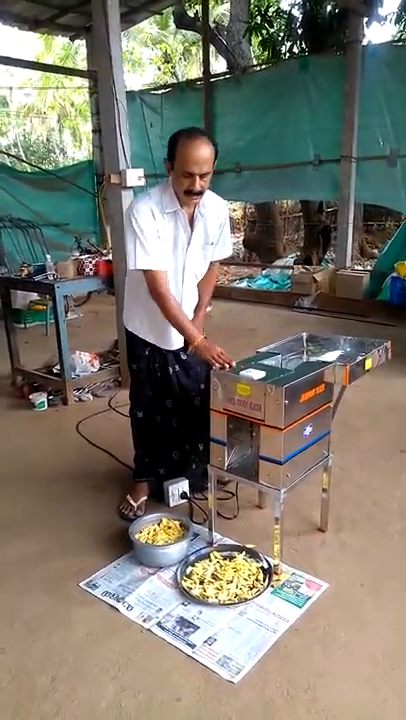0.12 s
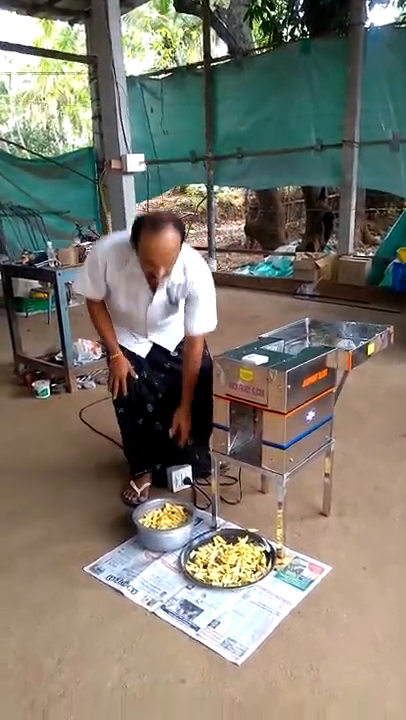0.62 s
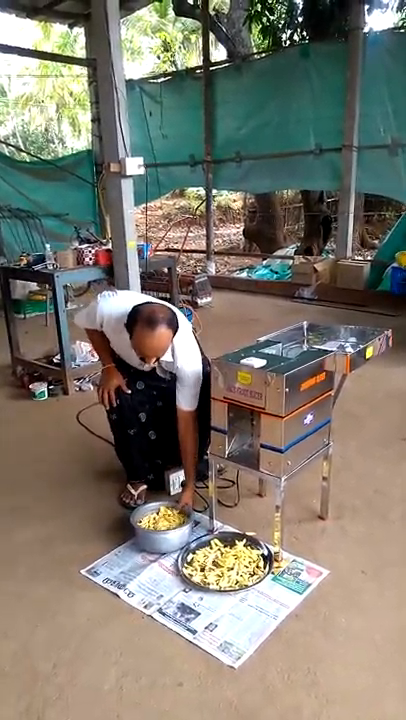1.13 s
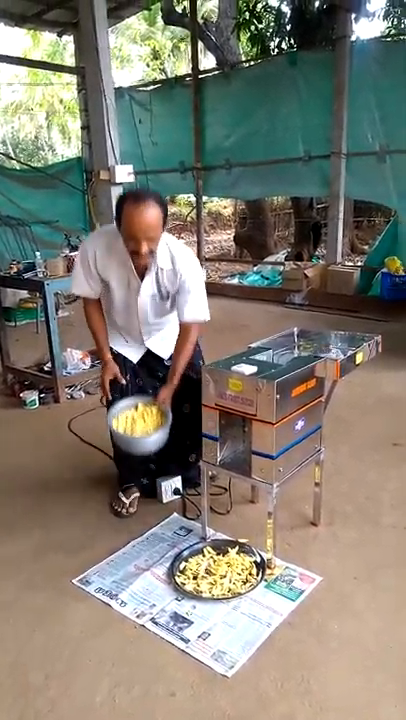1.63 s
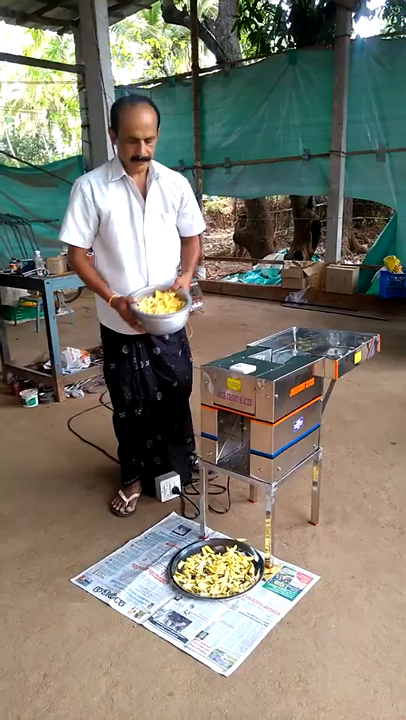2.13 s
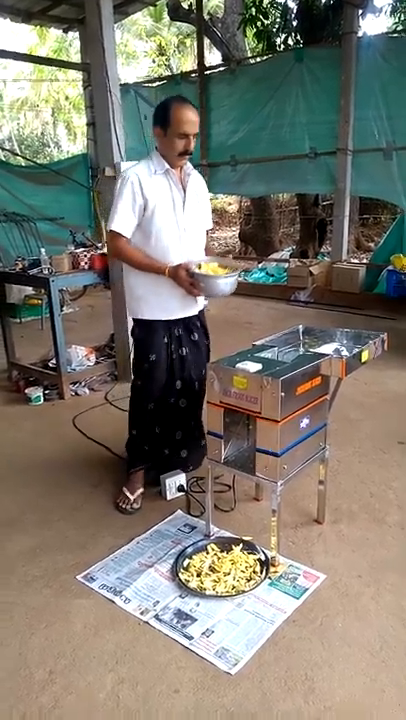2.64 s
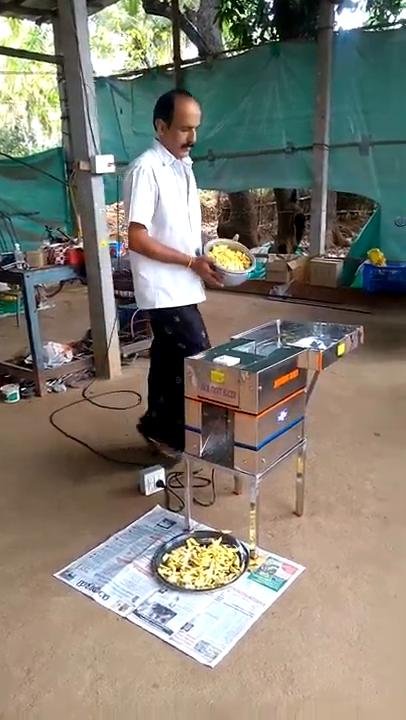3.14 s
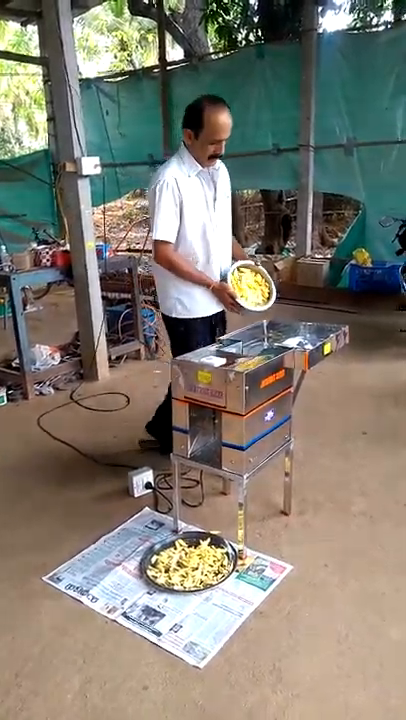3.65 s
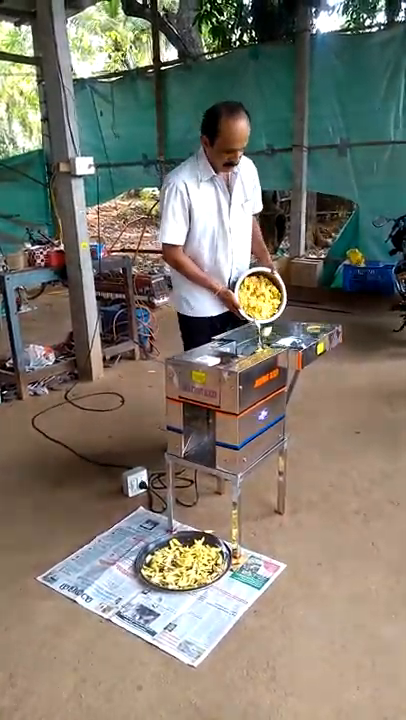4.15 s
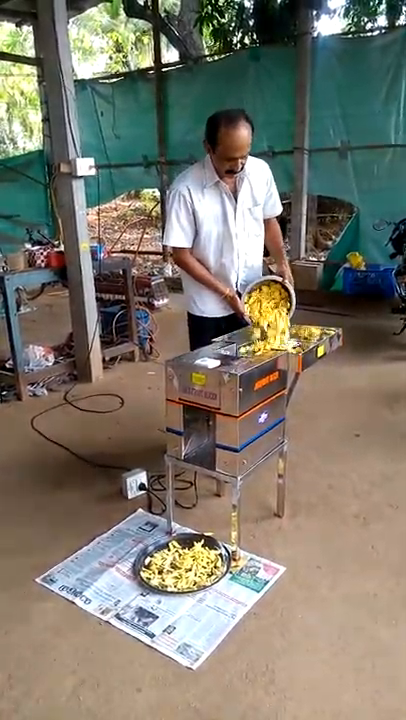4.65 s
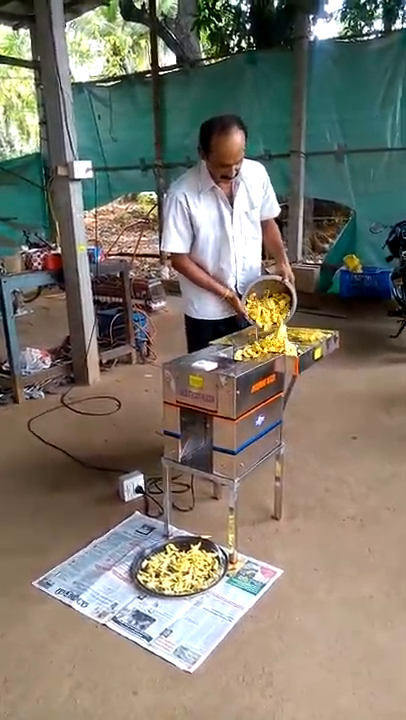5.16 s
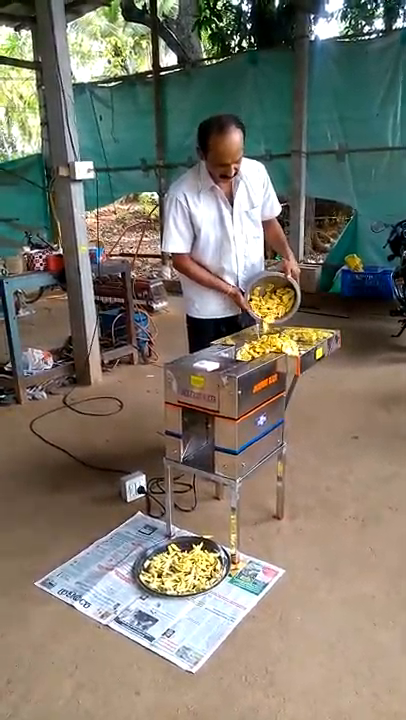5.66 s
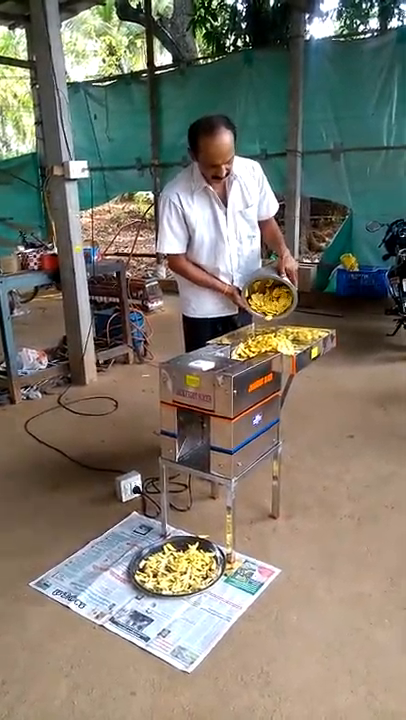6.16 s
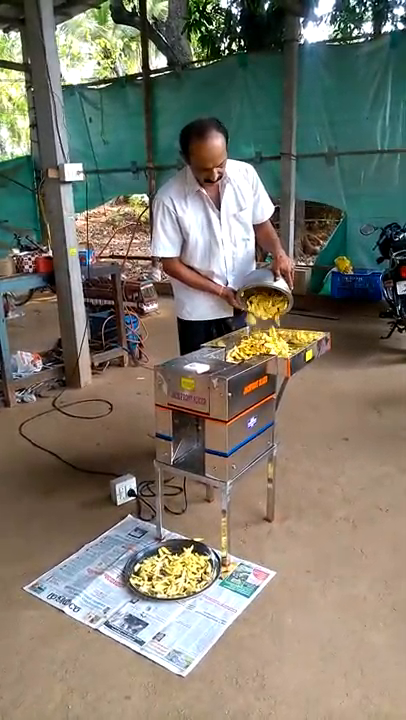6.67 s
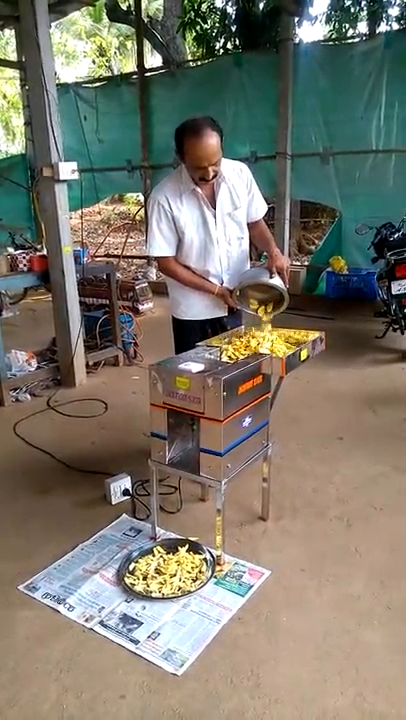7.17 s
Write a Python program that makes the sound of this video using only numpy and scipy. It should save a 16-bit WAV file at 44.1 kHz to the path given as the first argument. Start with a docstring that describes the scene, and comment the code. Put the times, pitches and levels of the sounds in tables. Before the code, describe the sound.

For about 7.3 seconds an idling electric slicer clatters without pause under an open shed. Every 0.28 seconds its steel disc rubs briefly, strikes a stop with a crisp, bright clack, bounces in two dense rattles, drums the thin casing and drags past a guard. Strengths vary slightly; the bright edge weakens around 3.2 to 3.7 seconds and again near 5.9. A high, thin hiss pulses with the turns until about 1.0 second, then stops abruptly. Light thuds occur at the start, near 0.8, and at 3.1 to 3.7; fruit booms and tumbles into the sheet-metal tray most strongly from 4.25 to 4.8, with a few soft blows and a low bump near 6.95. Quiet whirr, mains hum and occasional low moans sit beneath; faint low rumble grows after 6.2. Handheld stereo, bright right, shadowed left, with slight short reflections.

```python
"""An electric slicer idles under an open shed: once a turn its steel blade disc rubs up to a stop, clacks, rattles
and drags past the guard, made from bursts of tiny random impacts that ring the disc's modes.
Fruit thuds into the sheet-metal tray and tumbles there as blows on tray modes; the motor hums and moans in tones.
Shaped noise makes the whirr, an early hiss and a low rumble. A handheld microphone pair hears it all
brightly on the right and shadowed on the left."""
import sys
import numpy as np
from scipy import signal
from scipy.fft import rfft, irfft, next_fast_len
from scipy.io import wavfile

SR = 44100
rng = np.random.default_rng(int(sys.argv[2]) if len(sys.argv) > 2 else 0)


def linear_from_db(decibels):
    """Turn decibels (scalar or array-like) into linear amplitude factors; 0 gives 1."""
    return 10 ** (np.asarray(decibels, float) / 20)


def unload_audio(sound):
    """Save the sound as a 16-bit wav file, at the path given as the first command line argument."""
    columns = np.transpose(np.atleast_2d(sound))
    # keep every value between -1 and 1, then stretch to whole-number steps
    steps = np.round(np.clip(columns, -1, 1) * 32767)
    wavfile.write(sys.argv[1], SR, steps.astype(np.int16))


N = 322371
SIZE = next_fast_len(N + SR)
HZ = np.arange(SIZE // 2 + 1) * SR / SIZE
TIME = np.arange(N) / SR
TURN_S = .2762
RUBBED, STRUCK, REBOUNDING, DRAGGED = 1, 2, 3, 4  # ways of touching the disc


def evened(x):
    """Scales to an rms of 1."""
    return x / np.sqrt(np.mean(x ** 2) + 1e-20)


def read(points, column):
    """Reads one column of a spectrum table on every bin, along a log frequency axis."""
    table = np.transpose(points)
    return np.interp(np.log(HZ + 1), np.log(table[0] + 1), table[column])


def shaped(x, response):
    """Filters by a frequency response."""
    return irfft(rfft(x, SIZE) * response, SIZE)[..., :N]


def ring(hz, t60, db):
    """Response of one decaying mode; db is its height at resonance."""
    half_width = np.log(1000) / (2 * np.pi * t60)
    return linear_from_db(db) * half_width / (half_width + 1j * (HZ - hz))


def unit(response):
    """Scales a response so that white input keeps its power."""
    return response / np.sqrt(np.mean(abs(response) ** 2))


def contacts(per_s, spread_db):
    """Random small impacts of uneven size."""
    hit, size = rng.random((2, N))
    size_db = spread_db * np.minimum(-np.log(size + 1e-9), 4)
    return evened((hit < per_s / SR) * linear_from_db(size_db) * rng.standard_normal(N))


def pair(per_s, spread_db):
    """Two unrelated sets of contacts: each microphone port faces other parts of a source."""
    return np.array([contacts(per_s, spread_db), contacts(per_s, spread_db)])


def touch(t, start, end, start_db, end_db, rise, fall):
    """Gain of one contact: it rises, drifts while held, and falls away."""
    held_db = np.interp(t, [start, max(end, start) + 1 / SR], [start_db, end_db])
    return linear_from_db(held_db - rise * np.maximum(start - t, 0) - fall * np.maximum(t - end, 0))


# Turns of the disc. Each row: time of the clack in seconds, then the strengths in dB of
# the rub, the clack's bright edge, the rebound and the drag; each stage's contacts add their own dB.
TURNS = [(-0.1428, -33, -26, -22.5, -32.5), (0.1335, -37, -24.5, -29.5, -46),
         (0.4077, -34, -21.5, -28, -43), (0.6874, -35.5, -23, -31, -42), (0.962, -33, -22.5, -29.5, -49),
         (1.2378, -39, -22.5, -32, -51.5), (1.5154, -35, -22, -32, -53), (1.7914, -36.5, -22, -31, -50),
         (2.0687, -37, -19.5, -35, -57), (2.3464, -38, -22, -33, -55), (2.6195, -37.5, -21.5, -30.5, -42.5),
         (2.896, -39.5, -22, -33.5, -41.5), (3.1725, -39, -34.5, -33.5, -54),
         (3.4484, -43, -41, -34, -37.5), (3.7252, -36.5, -29.5, -33, -50),
         (4.0013, -36, -24.5, -32.5, -37.5), (4.2766, -39.5, -25, -30.5, -39),
         (4.5538, -32.5, -21, -33.5, -39.5), (4.8302, -35, -22.5, -32, -44.5), (5.104, -42, -26, -32, -45),
         (5.382, -36, -24, -39, -40), (5.657, -35.5, -24, -33, -37), (5.933, -47.5, -33.5, -31, -38.5),
         (6.2115, -35.5, -26.5, -35.5, -41), (6.4854, -35.5, -25, -34, -43), (6.7613, -34.5, -23, -32, -42),
         (7.0383, -36, -25, -36, -39), (7.3157, -32, -24, -32, -40)]
RUB_DB, EDGE_DB, REBOUND_DB, DRAG_DB = np.transpose(TURNS)[1:]


def every_turn(stage, levels_db):
    """Repeats the contacts of one stage at each turn with that turn's strength."""
    out = np.zeros(N)
    for row, db in zip(TURNS, levels_db * np.ones(len(TURNS))):
        a, b = np.clip(np.round((row[0] + np.array([-TURN_S, TURN_S])) * SR).astype(int), 0, N)
        power = sum(touch(TIME[a:b] - row[0], *contact) ** 2 for contact in stage)
        out[a:b] += linear_from_db(db) * np.sqrt(power)
    return out


# Modes of blade disc and frame. Each row: pitch in Hz, free t60 in seconds,
# relative height in dB when rubbed, struck, rebounding and dragged.
STEEL_MODES = [(1438, .09, -30, 2, -9, -25), (1873, .06, -27, -4, -14, -25), (2252, .12, -16, -3, -4, -18),
               (2320, .05, -16, -9, -10, -16), (2420, .04, -21, -7, -16, -20),
               (3714, .04, -22, -5, -15, -26), (4855, .04, -27, -9, -20, -30), (5254, .1, -20, -2, -9, -22),
               (5690, .05, -22, -5, -6, -18), (6872, .08, -18, -12, -10, -2), (7207, .12, 0, 1, -4, -14),
               (7360, .06, -20, -3, -1, -14), (7590, .07, -14, -2, -9, -11), (8365, .03, -24, -1, -7, -13),
               (8640, .04, -16, -3, -4, -10), (8893, .03, -20, -4, -3, -12), (9541, .09, -7, 5, -10, -7),
               (9851, .04, -18, -5, -12, -2), (10300, .035, -9, -4, -13, -3), (10770, .035, -4, -3, -9, -9),
               (10975, .035, -12, 1, -10, -12), (11390, .05, -14, 0, -11, -7),
               (11720, .03, -11, -4, -6, -8)]


def modes(way, free=1):
    """The disc's modes as one way of touching wakes them; lasting contact shortens the rings to the share free."""
    # neighbours alternate in sign
    return sum((-1) ** k * ring(m[0], m[1] * free, m[way + 1]) for k, m in enumerate(STEEL_MODES))


# Colour of the many weak modes in between. Each row: frequency in Hz,
# relative level in dB when rubbed, struck, rebounding and dragged.
STEEL_BLUR = [(474, -56, -34, -45, -36), (1190, -53, -44, -19.5, -22.5), (1680, -70, -7, -39, -75),
              (2700, -32, -18.5, -21.5, -21), (4120, -70, -13.5, -19, -26), (5560, -47, -7, -14, -57),
              (7200, -22, -9, -6.5, -31), (8820, -33, 2, -6.5, -12), (10140, -24, -6.5, -16, -12),
              (11530, -19, -20, -35, -7), (12400, -30, -4.5, -9, -56), (13500, -25, -9, -27, -60),
              (15700, -47, -8, -14, -43), (16000, -24.5, -9, -16, -17.5)]


def steel(stage, levels_db, way, per_s, spread_db, part=1, free=1):
    """Contacts of one stage ring the disc in their own way."""
    response = (modes(way, free) + linear_from_db(read(STEEL_BLUR, way))) * part
    return shaped(every_turn(stage, levels_db) * pair(per_s, spread_db), unit(response))


def blade_band():
    """Response of the band where the thin blades ring, 9.2 to 12.2 kHz."""
    return 1 / (1 + (9200 / (HZ + 1)) ** 24) / (1 + (HZ / 12200) ** 40)


# Contacts of the rub, and of the blades pressed along with it. Each row: touch and let-go in seconds after
# the clack, dB at touch, dB at let-go (both added to the turn's rub), rise in dB/s, fall in dB/s.
RUB_CONTACTS = [(-.075, -0.011, -9.5, -4.5, 1450, 900), (.004, 0.0056, 7.5, 11.5, 720, 4400)]
PRESS_CONTACTS = [(-0.029, -0.01, -2, 4, 1070, 1500)]


def rub():
    """Dense grazing contacts ring the disc; those on the blades ring shorter, in their own band."""
    blades = blade_band()
    body = steel(RUB_CONTACTS, RUB_DB, RUBBED, per_s=8000, spread_db=-0.5, part=1 - blades)
    press = steel(PRESS_CONTACTS, RUB_DB, RUBBED, per_s=9700, spread_db=4.0, part=blades, free=0.48)
    return body + press


CLACK_DB = -27.5  # every clack is equally hard; its contacts add their own dB


def blows(part):
    """One single impact opens every clack, so the same modes ring out each turn."""
    blow_below_db = -12.5  # under the clack's rattle
    train = np.zeros(SIZE)
    for row in TURNS[1:]:  # the first clack falls before the start
        train[round((row[0] + .002) * SR)] = linear_from_db(CLACK_DB + blow_below_db) * np.sqrt(0.014 * SR)
    return shaped(train, unit(modes(STRUCK) * part))


# Contacts of the clack and of its bright edge. Each row: touch and let-go in seconds after the clack,
# dB at touch, dB at let-go (added to the clack or the turn's edge), rise in dB/s, fall in dB/s.
CLACK_CONTACTS = [(.002, .016, 1.65, 0.82, 9000, 540)]
EDGE_CONTACTS = [(.002, .02, 2.94, -9.5, 5000, 366)]


def clack():
    """The disc strikes the stop: a clean blow, a rattle, and a bright edge from the blades."""
    blades = blade_band()
    rattle = steel(CLACK_CONTACTS, CLACK_DB, STRUCK, per_s=12000, spread_db=0.0, part=1 - blades)
    edge = steel(EDGE_CONTACTS, EDGE_DB, STRUCK, per_s=12000, spread_db=2.0, part=blades, free=0.51)
    return rattle + blows(1 / (1 + (HZ / 6000) ** 4)) + edge


# Contacts of the rebound. Each row: touch and let-go in seconds after the clack,
# dB at touch, dB at let-go (both added to the turn's rebound), rise in dB/s, fall in dB/s.
REBOUND_CONTACTS = [(.028, .049, -1, 0, 557, 875), (.071, .09, -6, -15.5, 800, 60)]


def rebound():
    """The disc bounces in two dense rattles that let its modes ring freely."""
    return steel(REBOUND_CONTACTS, REBOUND_DB, REBOUNDING, per_s=11000, spread_db=-0.5)


# Contacts of the drag. Each row: touch and let-go in seconds after the clack,
# dB at touch, dB at let-go (both added to the turn's drag), rise in dB/s, fall in dB/s.
DRAG_CONTACTS = [(.115, .16, 5.5, -1, 1690, 460), (.185, .23, -10, -8.5, 400, 900)]


def drag():
    """The disc scrapes past the guard, whose lasting touch shortens its rings."""
    return steel(DRAG_CONTACTS, DRAG_DB, DRAGGED, per_s=8000, spread_db=0.5, free=0.44)


# Loose knocks within a turn. Each row: time in seconds after the clack, dB added to the turn's knock level.
KNOCKS = [(-.055, -8), (-.027, -1), (.02, -12), (.072, 4.5), (.092, 7.5)]


def knock():
    """Dull knocks wake only the modes near 2.3 kHz; the lighter the rub, the harder they fall."""
    usual_db, usual_rub_db, db_per_rub_db = -50.5, -38, -0.23
    rise_db_per_s, fall_db_per_s = 600, 624
    stage = [(s, s, db, db, rise_db_per_s, fall_db_per_s) for s, db in KNOCKS]
    level_db = usual_db + db_per_rub_db * (RUB_DB - usual_rub_db)
    near_2300 = sum(ring(*m[:2], m[REBOUNDING + 1]) for m in STEEL_MODES[2:5])
    haze = linear_from_db(-17) * np.exp(-((HZ - 2520) / 260) ** 2)
    return shaped(every_turn(stage, level_db) * pair(900, 2.5), unit(near_2300 + haze))


# Contacts that drum the casing. Each row: touch and let-go in seconds after the clack,
# dB at touch, dB at let-go (both added to the drumming level), rise in dB/s, fall in dB/s.
DRUM_CONTACTS = [(.02, .085, 2.4, 0.47, 3300, 191)]
# Casing panel modes. Each row: pitch in Hz, t60 in seconds, relative height in dB.
CASING_MODES = [(650, 0.13, -10), (766, 0.2, -1.5), (842, 0.042, -11.5), (929, 0.06, 2.5),
                (1033.3, 0.19, 2), (1206, 0.073, 0.5), (1347, 0.2, -3), (1620, 0.095, 5.5)]
# Colour between the panel modes. Each row: frequency in Hz, relative level in dB.
CASING_BLUR = [(400, -42), (700, -14.5), (1000, -9.5), (1500, -6), (2800, -14), (4000, -22.5)]


def casing():
    """The casing panels drum after each clack, shaken by sparser contacts."""
    below_clack_db = -21
    panels = sum((-1) ** k * ring(*m) for k, m in enumerate(CASING_MODES))
    response = unit(panels + linear_from_db(read(CASING_BLUR, column=1)))
    return shaped(every_turn(DRUM_CONTACTS, CLACK_DB + below_clack_db) * pair(2500, 2.1), response)


def slicer():
    """All stages of the turning disc, and the casing that drums along."""
    return rub() + clack() + rebound() + drag() + knock() + casing()


# Single blows on the tray. Each row: time in seconds, peak in dB, strongest ring in Hz.
THUDS = [(0.042, -49, 264), (0.135, -56, 200), (0.744, -64, 200), (0.838, -49, 660), (0.845, -51, 200),
         (3.09, -58, 275), (3.668, -56, 280), (3.732, -54, 285), (4.273, -43, 400), (4.309, -39.5, 283),
         (4.349, -44.5, 646), (4.409, -43, 274), (4.551, -40, 280), (4.598, -42.5, 262), (4.757, -50, 373),
         (6.936, -52, 266), (6.955, -49, 478), (6.999, -55, 624)]
# Modes of the sheet-metal tray. Each row: pitch in Hz, t60 in seconds, relative level in dB.
TRAY_MODES = [(201, 0.12, -4.5), (264, 0.14, -2), (279.4, 0.2, 0.5), (383, 0.076, 2), (478, 0.13, -2),
              (622, 0.23, -1.5), (876, 0.088, -20)]


def tray():
    """Soft blows of fruit set the tray booming, each favouring the modes near its own ring."""
    out, t = np.zeros(N + SR), np.arange(SR // 4) / SR
    phases = rng.random((len(THUDS), len(TRAY_MODES)))
    for (s, db, near_hz), phase in zip(THUDS, phases):
        boom = np.zeros(len(t))
        for (hz, t60, level), p in zip(TRAY_MODES, phase):
            mode_db = level - 9.9 * abs(np.log2(hz / near_hz))  # weaker with every octave away
            boom += linear_from_db(mode_db - 60 * t / t60) * np.sin(2 * np.pi * (hz * t + p))
        boom *= 1 - np.exp(-t / 0.0037)  # soft onset
        out[round(s * SR):][:len(t)] += linear_from_db(db) * boom / abs(boom).max()
    return out[:N]


# Things sliding and tumbling on the tray. Each row: start and end in seconds,
# dB at start, dB at end, rise in dB/s, fall in dB/s.
TUMBLES = [(0, .03, -50, -56, 300, 130), (.3, .98, -68, -62, 30, 90), (4.29, 4.42, -49, -51, 500, 200),
           (4.545, 4.64, -49, -50, 260, 190), (4.1, 4.8, -67, -62, 200, 25)]
# Colour between the tray modes. Each row: frequency in Hz, relative level in dB.
TUMBLE_COLOUR = [(100, -41), (150, -2), (300, -17), (500, -8), (800, -1.5), (1200, -19), (2000, -49)]


def tumble():
    """Many small soft blows rumble through the tray."""
    level = np.sqrt(sum(touch(TIME, *row) ** 2 for row in TUMBLES))
    body = sum((-1) ** k * ring(*m) for k, m in enumerate(TRAY_MODES)) + linear_from_db(read(TUMBLE_COLOUR, column=1))
    return level * evened(shaped(pair(700, 2.0), body))


# Mains hum. Each row: pitch in Hz, rms in dB.
HUM = [(100, -71)]
# Faint unsteady motor tones. Each row: pitch in Hz, rms in dB.
FUZZY_TONES = [(155, -84.5), (200, -82.5), (300, -82), (394, -76), (505, -80.5)]
# Swells of the moaning motor tone. Each row: time of the top in seconds, level there in dB.
MOANS = [(0.983, -57.5), (1.63, -66), (2.452, -61), (2.68, -66), (3.28, -60.5), (4.093, -56.5),
         (4.88, -63.5), (5.74, -59.5)]


def motor():
    """Mains hum as sines, unsteady tones as narrow noise, a moan that comes and goes, a regular groan."""
    hum = sum(linear_from_db(db) * np.sqrt(2) * np.sin(2 * np.pi * hz * TIME) for hz, db in HUM)
    fuzzy = sum(linear_from_db(db) * evened(shaped(rng.standard_normal(N), ring(hz, .6, 0))) for hz, db in FUZZY_TONES)

    moan_hz, moan_width_s = 396, 0.052
    waver = evened(shaped(rng.standard_normal(N), ring(moan_hz, 0.12, 0)))
    moan = evened(np.sin(2 * np.pi * moan_hz * TIME) + 0.45 * waver)
    moan = moan * sum(linear_from_db(db) * np.exp(-((TIME - s) / moan_width_s) ** 2) for s, db in MOANS)

    groan_hz, groan_db, groan_width_s = 205, -68, .05
    first_s, every_s = .02, .826
    since = (TIME - first_s + every_s / 2) % every_s - every_s / 2  # seconds from the nearest groan
    groan = linear_from_db(groan_db) * np.exp(-(since / groan_width_s) ** 2) * np.sin(2 * np.pi * groan_hz * since)
    return hum + fuzzy + groan + moan


# Colour of the early hiss. Each row: frequency in Hz, relative level in dB.
HISS_COLOUR = [(6000, -23.5), (9000, -28), (9600, 1), (12000, -0.5), (13000, -8.5), (15500, -4.5),
               (16500, -32.5)]


def hiss():
    """A high hiss at the start rings the blades, swells once a turn, then stops."""
    level_db, swell_db, top_s, end_s, fall_db_per_s = -36.5, 1.5, 0.23, 1.032, 330
    response = linear_from_db(read(HISS_COLOUR, column=1)) * (linear_from_db(-13) + modes(RUBBED, free=.7))
    swell = swell_db * np.cos(2 * np.pi * (TIME - top_s) / TURN_S)
    gain_db = level_db + swell - fall_db_per_s * np.maximum(TIME - end_s, 0)
    return evened(shaped(pair(3000, 1.3), response)) * linear_from_db(gain_db)


# A dull bump on the microphone, one row: time in seconds, level in dB, pitch in Hz, half length in seconds.
BUMP = (6.942, -55, 52, .035)


def bump():
    """A low sine under a short bell-shaped swell."""
    s, db, hz, half_s = BUMP
    return linear_from_db(db) * np.exp(-((TIME - s) / half_s) ** 2) * np.sin(2 * np.pi * hz * (TIME - s))


# Course of the low wavering rumble. Each row: time in seconds, level in dB.
RUMBLE = [(0.0, -66), (0.6, -85), (1.2, -84), (2.2, -82), (2.7, -88), (6.1, -87), (6.3, -71), (6.75, -78),
          (7.31, -76)]


def rumble():
    """Noise in a narrow band near 52 Hz wavers at each port on its own."""
    noise = evened(shaped(rng.standard_normal((2, N)), ring(52.4, 0.37, 0) ** 2))
    return noise * linear_from_db(np.interp(TIME, *np.transpose(RUMBLE)))


# Colour of motor whirr and yard. Each row: frequency in Hz, relative level in dB.
WHIRR_COLOUR = [(100, -21), (150, -7), (280, -5), (450, -8), (580, -1), (660, 5), (900, -2.5), (1150, -5.5),
                (2300, -9), (3200, -6), (4200, -7.5), (5500, -0.5), (6300, -27), (7100, 0), (8700, -6),
                (11800, 1.5), (12400, -5), (15800, -8)]


def whirr():
    """Steady shaped noise of the motor and the yard."""
    return linear_from_db(-51.5) * evened(shaped(rng.standard_normal((2, N)), linear_from_db(read(WHIRR_COLOUR, column=1))))


def echoes(t60, start):
    """Sparse reflections of random sign, as a response of unit power."""
    at = np.arange(SR // 40) * 20 + rng.integers(0, 20, SR // 40)
    taps = np.zeros(SR)
    taps[at + round(start * SR)] = rng.choice([-1., 1.], len(at)) * linear_from_db(-60 * at / SR / t60)
    return unit(rfft(taps, SIZE))


# Left port against right. Each row: frequency in Hz, level in dB, share arriving directly from 0 to 1.
LEFT_PORT = [(60, 0, 0.95), (150, 0, 1), (350, 1, 0.97), (670, 0, 0.93), (1220, -5, 0.52),
             (2320, 1.5, 0.93), (3770, -6.5, 0.067), (4060, -19, 0.58), (4370, -8.5, 0.27),
             (5570, -4.5, 0.81), (7240, -5.5, 0.78), (9300, -15.5, 0.52), (9900, -24.5, 1),
             (11900, -9.5, 0.49), (13500, -17.5, .3), (15300, -11, .3)]
# Phase of the left port's direct sound. Each row: frequency in Hz, lead over the right in radians.
LEFT_LEAD = [(300, 0), (690, -.5), (1640, 0), (3190, 0), (3880, 3.6), (5250, 6.3), (10200, 6.9),
             (11400, 19), (15900, 20)]


def scene():
    """The right port faces the machine; the left hears it shadowed and partly from its other side."""
    sources = slicer() + tray() + tumble() + motor() + hiss() + bump() + rumble() + whirr()
    near, far = rfft(sources, SIZE)
    direct = np.clip(read(LEFT_PORT, column=2), 0, 1)
    far = np.sqrt(1 - direct ** 2) * (far - direct * near)  # what both ports hear alike is not counted twice
    led = direct * near * np.exp(1j * read(LEFT_LEAD, column=1))
    left = linear_from_db(read(LEFT_PORT, column=1)) * (led + far)
    roof = linear_from_db(-11.0) * np.clip(HZ / 400, 0, 1)  # floor and roof return a little of everything but the bass
    left = left * (1 + roof * echoes(0.43, .008))
    right = near * (1 + roof * echoes(0.12, .008))
    return irfft([left, right], SIZE)[:, :N]


def low_pass(x):
    """Removes everything above the highest recorded frequency."""
    return signal.sosfilt(signal.butter(12, 16340, fs=SR, output="sos"), x)


def record(dry):
    """The microphone channel cuts the bass and ends steeply in the treble."""
    edge_hz, bass_cut_hz = 15800, 44
    loss = (1 + (HZ / edge_hz) ** 300) * (1 + (bass_cut_hz / (HZ + 1)) ** 6)
    mix = shaped(dry, 1 / np.sqrt(loss))
    return low_pass(mix)


dry = scene()
out = record(dry)
unload_audio(out)
```